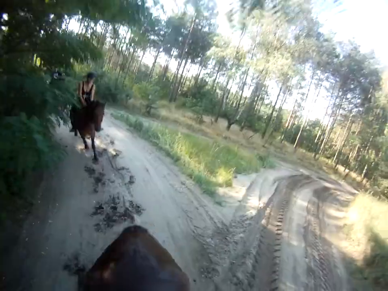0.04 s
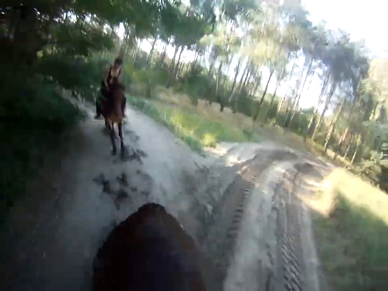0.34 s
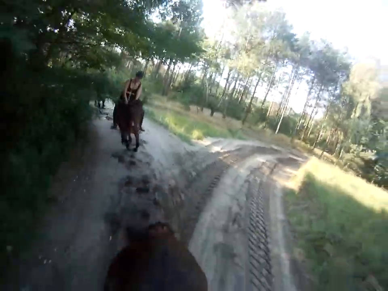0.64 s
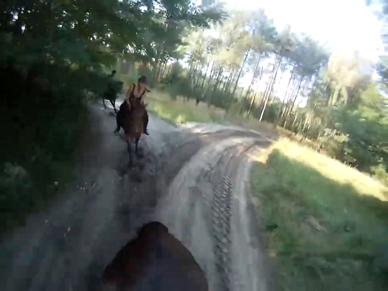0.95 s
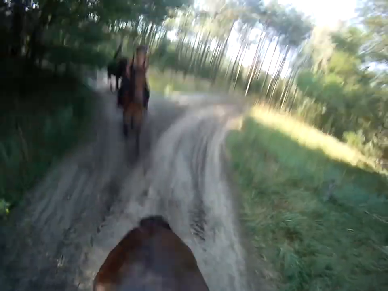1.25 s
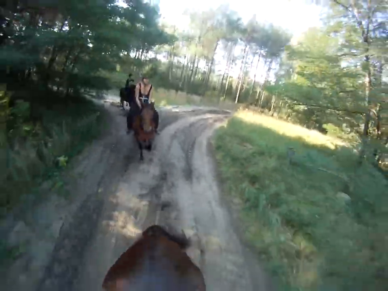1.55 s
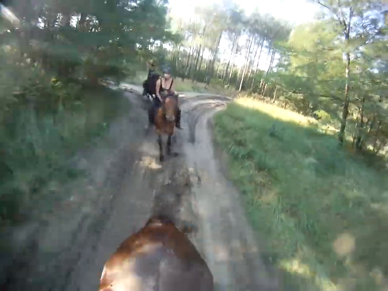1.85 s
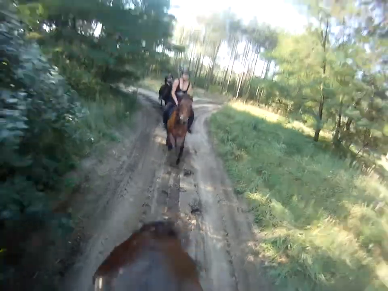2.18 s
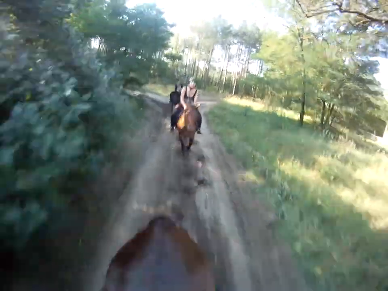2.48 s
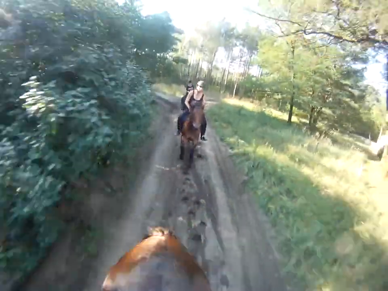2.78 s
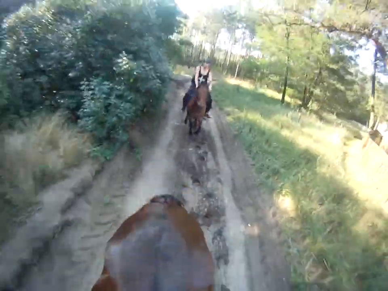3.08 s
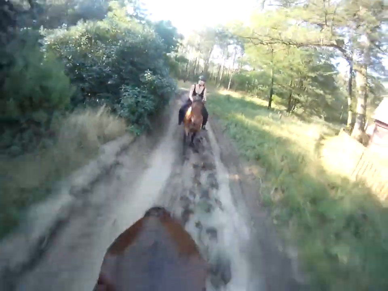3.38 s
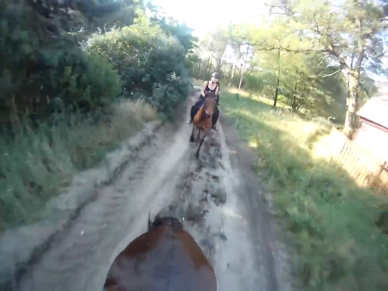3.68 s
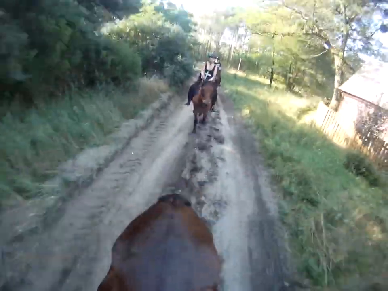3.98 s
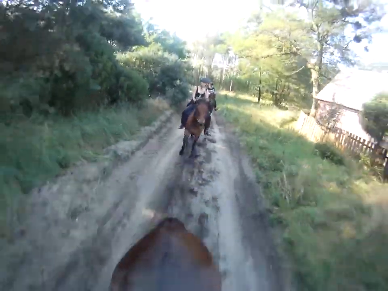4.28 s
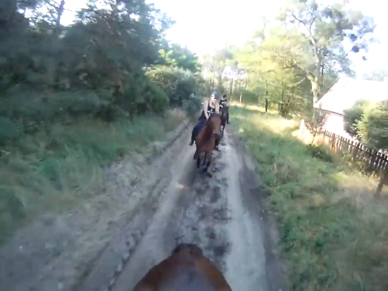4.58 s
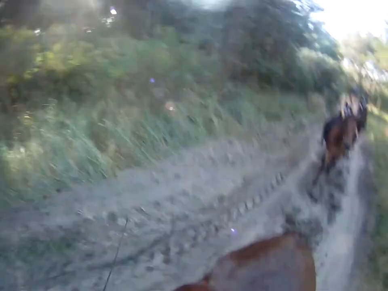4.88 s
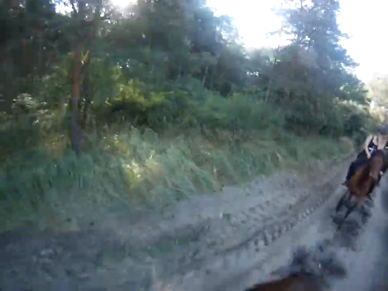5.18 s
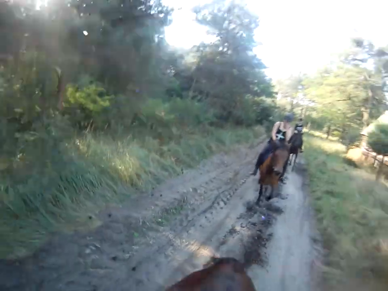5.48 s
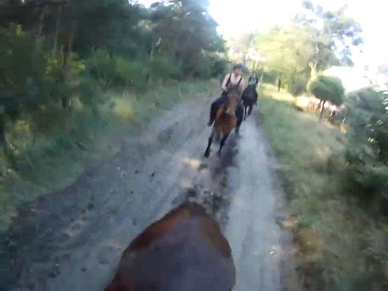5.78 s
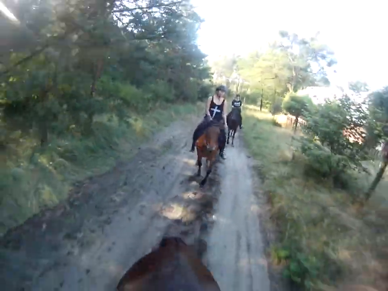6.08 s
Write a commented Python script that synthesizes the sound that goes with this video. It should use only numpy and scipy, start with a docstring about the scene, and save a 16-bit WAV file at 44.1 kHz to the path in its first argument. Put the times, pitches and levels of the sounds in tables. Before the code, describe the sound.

A horse's trot along a sandy track is heard only as jolts through a plastic case strapped to the rider. About twice a second the case scrapes briefly in its mount and gives a low double bump with a dull shudder. Sharp plastic ticks and a few tiny creaks fall between the strides. The microphone is inside the case, so everything is very close, over a faint, muffled outdoor hush.

```python
"""A horse trots along a sandy track, heard through a cased camera strapped to the rider.
A faint outdoor hush is there from the start; almost at once plastic parts rub, tick and creak.
The sand swallows the hooves, so each stride arrives through the body as a jolt: the case slides in its
mount, bumps with a dull shudder, slips, bumps again, swings out on its strap and slides back.
Fourteen strides pass in this way, and a last short creak follows the thirteenth."""
import sys
import numpy as np
from scipy import signal
from scipy.fft import rfft, irfft
from scipy.io import wavfile
from scipy.ndimage import uniform_filter1d

SR = 44100
rng = np.random.default_rng(int(sys.argv[2]) if len(sys.argv) > 2 else 0)


def put_to_file(sound):
    """Save the sound as 16-bit audio at rate SR, in the file named by the first command-line argument."""
    columns = np.atleast_2d(sound).T  # one column per channel
    safe = np.clip(columns, -1, 1)
    whole_steps = np.round(safe * 32767)
    wavfile.write(sys.argv[1], SR, whole_steps.astype(np.int16))


N = 275184
TIME = np.arange(N) / SR

# Noise spectra of the outdoors, the mount's rumble and the sound that parts the channels:
# frequency_hz, relative_density_db
HUSH_SPECTRUM = [(25, -13), (52, 26), (100, 20.5), (200, 9.5), (400, 3), (700, -2), (1150, -2.5),
                 (1600, -6), (2150, -1), (2700, -7.5), (3600, -11.5), (4400, -12.5), (5100, -13.5),
                 (6000, -20.5)]
SHUDDER_SPECTRUM = [(30, -24.5), (70, 4), (110, -0.5), (200, -6), (280, -12), (420, -31.5), (800, -30),
                    (2000, -48.5)]
SIDE_SPECTRUM = [(40, -18), (110, -13.5), (210, -5.5), (400, -1.5), (900, -7), (2500, -12.5), (6000, -24)]
# Resonances of the case: centre_hz, width_hz, rubbed_db, tapped_db
CASE_MODES = [(197, 180, -8, -12), (480, 720, -14, -17), (878, 151, -2, -39), (1083, 133, -1.5, -17),
              (1390, 248, -4.5, -6.5), (1795, 540, -7.5, -7.5), (2018, 180, -0.5, -52),
              (2197, 150, -2, 3.5), (2436, 270, -9.5, -13), (2810, 203, -13.5, -8), (3512, 472, -18, -1.5),
              (4130, 670, -35, -12), (5056, 615, -33.5, -1.5)]
# The case slides back as the rider rises: start_s, length_s, level_db, snap_energy_db
BACK_SLIDES = [(.046, 0.031, -33, -20), (0.3363, .03, -54, -17.5), (0.8016, 0.056, -38, -5.5),
               (1.24, 0.063, -41.5, -28), (1.712, 0.036, -50.5, -26), (2.134, 0.07, -47, -26.5),
               (2.585, 0.025, -45.5, -18), (3.043, 0.017, -51.5, -33), (3.5, 0.028, -43, -18),
               (3.94, .02, -39, -13.5), (4.418, 0.019, -37.5, -10.5), (4.9083, 0.079, -43, -8.5),
               (5.4102, 0.08, -50.5, -8.5), (5.828, 0.025, -43, -31)]
# The case brushes its mount between slides: start_s, length_s, level_db
LIGHT_BRUSHES = [(0.084, 0.041, -54), (.48, 0.054, -58.5), (3.803, .03, -54), (4.382, 0.023, -43.5),
                 (4.983, 0.042, -57.5), (5.313, 0.09, -59.5)]
# Plastic parts catch and let go: start_s, energy_db, hardness (0 soft, about 1 hard)
PLASTIC_TICKS = [(0.0553, -2, 0.01), (0.0722, 2, 0.97), (.2067, -30, 0.7), (.2419, -24.5, 0.7),
                 (0.5802, -4, 0.9), (.662, -22, 0.5), (0.6855, 2.5, 0.82), (.713, 1, 0), (.836, -6, 0.02),
                 (0.8651, -3, 1.03), (0.9926, -30, .57), (1.174, -10.5, 0.4), (1.2484, -16.5, 1),
                 (1.344, -14, 0.02), (1.5066, -19, 0.78), (1.5717, -4, 1), (1.5812, 9, 0.17),
                 (2.033, -15.5, 0), (2.066, -5.5, 0.2), (2.4145, -12, 0.82), (2.8077, -10, 0.47),
                 (2.8519, -7.5, 0.73), (2.9222, -17.5, 0.65), (3.1937, -3, 0.72), (3.3037, -21, 0.7),
                 (3.3755, -10.5, 0.65), (3.4444, -8.5, 0), (3.888, -6, 0), (4.1458, -17.5, 0.53),
                 (4.1571, -13, 0.23), (4.2303, -17.5, .55), (4.2834, -17.5, 0.37), (4.5814, -26.7, 0.2),
                 (4.7518, -17, 0), (4.9709, -5, 1), (5.4474, -10, 0), (5.4775, -4, 0.98),
                 (5.616, -17.5, 0.6), (5.6244, -8.5, 0.79), (5.7761, -6, 0.2)]
# The mount creaks and nudges the strap: start_s, length_s, level_db, slip_rate_hz, swing_db
MOUNT_CREAKS = [(0.058, 0.011, -40, 500, -22), (1.341, 0.02, -49.5, 480, -46),
                (3.174, .0175, -38, 516, -24.5), (3.191, 0.012, -44, 620, -35),
                (5.45, 0.00875, -31, 590, -25), (5.9528, 0.0098, -23, 530, -25)]
# Resonances of the mount's clip: frequency_hz, relative_level_db, t60_s
CLIP_MODES = [(540, 1, 0.0071), (1080, 2.5, 0.025), (1490, 10.5, 0.0041), (2060, 0, 0.042),
              (2700, -46, 0.0043), (3530, -30, .006)]
# One jolt a stride: landing_s, bump_gap_s, first_bump_db, landing_bump_db, contact_ms,
# shudder_db, swing_db, swing_decay_db_per_s, slide_start_s, slide_db
STRIDE_JOLTS = [(.307, 0.025, -12.5, -5, 1.02, -28, -21, 118, .246, -40.5),
                (.777, 0.045, -5.5, -13, 0.98, -29.5, -12, 167, .693, -34.5),
                (1.209, .026, -8.5, -2.5, 0.56, -22.5, -17, 108, 1.1355, -31.5),
                (1.654, 0.028, -9, -3.5, 0.59, -30, -20, 127, 1.584, -29.5),
                (2.095, 0.027, -7.5, -3.5, 1.1, -28, -17.5, 130, 2.032, -34.5),
                (2.546, 0.028, -8, -4, 1.38, -27.5, -18.5, 95, 2.476, -33.5),
                (2.997, 0.039, -18.5, -8, 1.65, -34.5, -13.5, 139, 2.924, -39),
                (3.462, 0.04, -17, -12.5, 1, -36, -13.5, 222, 3.383, -42),
                (3.902, 0.035, -15, -10, 2.4, -33.5, -12, 144, 3.8347, -39.5),
                (4.374, 0.037, -9.5, -10.5, 3.1, -32.5, -14, 268, 4.295, -40),
                (4.858, 0.047, -9, -5.5, 1.54, -31.5, -15.5, 153, 4.772, -34.5),
                (5.299, 0.03, -6.5, -9, 1.06, -30, -13.5, 120, 5.225, -34.5),
                (5.794, 0.043, -13, -12.5, 2.53, -35, -13, 216, 5.708, -38.5),
                (6.236, 0.026, -7.5, -7, 2.3, -32.5, -14, 144, 6.176, -37)]


def amp(db):
    """Decibels to amplitude ratio."""
    return 10 ** (np.asarray(db) / 20)


def unit_rms(x):
    """Normalises a signal to unit mean power."""
    return x / np.sqrt(np.mean(x ** 2) + 1e-20)


def add(mix, start_s, sound):
    """Superposes a sound on the mix."""
    part = mix[max(round(start_s * SR), 0):][:len(sound)]
    part += sound[:len(part)]


def noise(spectrum):
    """Spectral shaping of white noise, at unit rms."""
    hz, db = np.transpose(spectrum)
    shape = amp(np.interp(np.log(np.fft.rfftfreq(N, 1 / SR) + 1), np.log(hz), db))
    return unit_rms(irfft(rfft(rng.standard_normal(N)) * shape, N))


def drift(rate_hz):
    """Low-passed noise: a slow random fluctuation at unit rms."""
    shape = np.exp(-(np.fft.rfftfreq(N, 1 / SR) / rate_hz) ** 2)
    return unit_rms(irfft(rfft(rng.standard_normal(N)) * shape, N))


def hush(level_db=-52, threshold_db=-8, dip_per_db=1.5, deepest_db=8, lag_s=0.089, width_s=0.098):
    """Transmission through the closed case colours the outdoor noise; it dips after hard landings."""
    dip_db = np.zeros(N)
    for landing_s, _, _, bump_db, *_ in STRIDE_JOLTS:
        depth_db = np.clip(dip_per_db * (bump_db - threshold_db), 0, deepest_db)
        dip_db += depth_db * np.exp(-((TIME - landing_s - lag_s) / width_s) ** 2)
    return amp(level_db - dip_db) * noise(HUSH_SPECTRUM)


def strap_swing(pitch_hz=36, waver=0.11, rest_db=-59, build_db_per_s=215,
                landing_lag_s=0.01388, creak_lag_s=0.029, creak_decay_db_per_s=240):
    """Damped oscillation on the springy strap: a faint rocking swells after each landing or creak."""
    kicks = [(s + landing_lag_s, db, decay) for s, *_, db, decay, _, _ in STRIDE_JOLTS]
    kicks += [(s + creak_lag_s, db, creak_decay_db_per_s) for s, *_, db in MOUNT_CREAKS]
    phase = 2 * np.pi * np.cumsum(pitch_hz * (1 + waver * drift(rate_hz=9))) / SR
    out = amp(rest_db) * np.sin(phase)
    for peak_s, db, decay_db_per_s in kicks:
        near = abs(TIME - peak_s) < 0.5
        t = TIME[near] - peak_s
        envelope = amp(db - np.maximum(-build_db_per_s * t, decay_db_per_s * t))
        out[near] += envelope * np.cos(phase[near] - np.interp(peak_s, TIME, phase))
    return np.sqrt(2) * out  # the levels are rms


def case_ring(hardness, scatter_db, size=2048):
    """Impulse response of the case, at unit energy; each contact point weights the modes differently."""
    centre_hz, width_hz, rubbed_db, tapped_db = np.transpose(CASE_MODES)
    db = rubbed_db + hardness * (tapped_db - rubbed_db) + scatter_db * rng.standard_normal(len(centre_hz))
    hz = abs(np.fft.fftfreq(size, 1 / SR))[:, None]
    power = (amp(db) ** 2 / (1 + ((hz - centre_hz) / width_hz) ** 2) ** 4).sum(1)
    log_gain = 0.5 * np.log(power + 1e-8)
    ring = np.fft.ifft(np.exp(np.conj(signal.hilbert(log_gain)))).real  # minimum phase, hence causal
    return ring / np.linalg.norm(ring)


def snap(energy_db, hardness, grit=0.15, hard_s=0.0019, soft_s=0.0034):
    """Impulse excitation with brief chatter: harder snaps are shorter and reach the case's upper modes."""
    t = np.arange(SR // 60) / SR
    chatter_s = np.interp(hardness, [0, 1], [soft_s, hard_s])
    force = grit * rng.standard_normal(len(t)) * np.exp(-t / chatter_s)
    force[0] += 1
    tick = signal.fftconvolve(force, case_ring(hardness, scatter_db=0.5))
    return amp(energy_db) * tick / np.linalg.norm(tick)


def slides(creep_s=0.026, slip_share=0.46):
    """Motion of case against mount: start_s, length_s, level_db, swell_db, throb_db, snap_energy_db."""
    no_snap = -np.inf
    rows = [(s, length_s, db, -2, 5, snap_db) for s, length_s, db, snap_db in BACK_SLIDES]
    rows += [(s, length_s, db, -3, 0, no_snap) for s, length_s, db in LIGHT_BRUSHES]
    for landing_s, gap_s, *_, start_s, db in STRIDE_JOLTS:
        slide_s = max(landing_s - gap_s - start_s, 0.01)
        slip_s = slip_share * gap_s
        rows += [(start_s - creep_s, creep_s, db - 21, 12, 0, no_snap),  # creeps
                 (start_s, slide_s, db, 6, 1, db + 17),  # slides ever harder into the first bump
                 (landing_s - slip_s, slip_s, db - 2, -9, 0, db + 21)]  # slips before the second
    return rows


def rubs(slips_per_s=1100, spread_db=4.5, uneven_db=3, rise_s=0.0029, fall_s=0.0049, throb_hz=28):
    """Stick-slip friction: the case breaks free, often with a snap, and tiny irregular slips ring it."""
    out = np.zeros(N)
    sizes = amp(spread_db * np.minimum(rng.exponential(1, N), 3)) * rng.choice([-1, 1], N)
    slips = unit_rms(sizes * (rng.random(N) < slips_per_s / SR))
    friction = (slips + 0.4 * rng.standard_normal(N)) * amp(uneven_db * drift(rate_hz=91))
    for start_s, length_s, db, swell_db, throb_db, snap_db in slides():
        force = friction[max(round(start_s * SR), 0):][:round((length_s + 0.03) * SR)]
        t = np.arange(len(force)) / SR
        pressure = (1 - np.exp(-t / rise_s)) * np.exp(-np.maximum(t - length_s, 0) / fall_s)
        pressure *= amp(swell_db * np.minimum(t / length_s, 1))
        pressure *= amp(throb_db * np.cos(2 * np.pi * throb_hz * t))
        rub = signal.fftconvolve(force * pressure, case_ring(hardness=0, scatter_db=3.5))
        add(out, start_s, amp(db) * rub * np.sqrt(length_s * SR) / np.linalg.norm(rub))
        add(out, start_s, snap(snap_db, hardness=0))
    return out


def ticks(below_bump_db=11):
    """Free vibration of the case, set off as plastic parts let go and by each landing bump."""
    out = np.zeros(N)
    for start_s, energy_db, hardness in PLASTIC_TICKS:
        add(out, start_s, snap(energy_db, hardness))
    for landing_s, _, _, bump_db, *_ in STRIDE_JOLTS:
        add(out, landing_s, snap(bump_db - below_bump_db, hardness=0.76))
    return out


def creaks(jitter=0.078, fade_db=-9, contact_s=0.00007):
    """Relaxation oscillation: a few slips fall nearly into step, each ringing the clip of the mount."""
    out, t = np.zeros(N), np.arange(SR // 20) / SR
    ring = sum(amp(db - 60 * t / t60_s) * np.sin(2 * np.pi * hz * t) for hz, db, t60_s in CLIP_MODES)
    ring = np.convolve(ring, signal.windows.gaussian(21, contact_s * SR))  # contact time dulls the treble
    for start_s, length_s, db, slip_rate_hz, _ in MOUNT_CREAKS:
        gaps_s = (1 + jitter * rng.standard_normal(20)) / slip_rate_hz
        slips_s = np.cumsum(gaps_s) - gaps_s[0]
        creak = np.zeros(SR // 10)
        for slip_s in slips_s[slips_s < length_s]:
            add(creak, slip_s, amp(fade_db * slip_s / length_s) * ring)
        add(out, start_s, amp(db) * creak * np.sqrt(length_s * SR) / np.linalg.norm(creak))
    return out


def shudder(width_gaps=1.326, lead_gaps=0.68):
    """Forced vibration: a stride's weight passes through the mount as a rumble between the two bumps."""
    envelope = sum(amp(db) * np.exp(-((TIME - landing_s + lead_gaps * gap_s) / (width_gaps * gap_s)) ** 2)
                   for landing_s, gap_s, _, _, _, db, *_ in STRIDE_JOLTS)
    return envelope * noise(SHUDDER_SPECTRUM)


def bumps(pitch_hz=54, t60_s=0.058, first_stretch=1.5):
    """A heavily damped resonator, the mount, takes two pushes a stride; the first is longer, so duller."""
    out, t = np.zeros(N), np.arange(SR // 6) / SR
    ring = amp(-60 * t / t60_s) * np.cos(2 * np.pi * pitch_hz * t)
    push_ms = 1000 * np.arange(-600, 600) / SR
    for landing_s, gap_s, first_db, landing_db, contact_ms, *_ in STRIDE_JOLTS:
        pair = (landing_s - gap_s, first_db, contact_ms * first_stretch), (landing_s, landing_db, contact_ms)
        for peak_s, db, width_ms in pair:
            push = 1 / np.cosh(np.pi / 2 * push_ms / width_ms)
            bump = signal.fftconvolve(push, ring)
            add(out, peak_s - np.argmax(bump) / SR, -amp(db) * bump / bump.max())
    return out


def scene(imbalance_db=-20, side_db=-47, rejoin_s=0.051, hiss_db=-77):
    """Mid-side stereo, nearly mono: the channels part briefly after each landing, over a faint hiss."""
    middle = hush() + strap_swing() + rubs() + ticks() + creaks() + shudder() + bumps()
    parting = sum(amp(bump_db) * (TIME > landing_s) * np.exp(-abs(TIME - landing_s) / rejoin_s)
                  for landing_s, _, _, bump_db, *_ in STRIDE_JOLTS)
    parting = uniform_filter1d(parting, size=300)
    imbalance = amp(imbalance_db) * drift(rate_hz=10) * middle
    side = parting * (imbalance + amp(side_db) * noise(SIDE_SPECTRUM))
    side += amp(hiss_db) * noise([(100, -6), (3500, -3.5), (6000, -4), (8000, -39)])
    return np.array([middle + side, middle - side])


def record(dry, low_cut_hz=12, hold_hz=12000, band_limit_hz=15450):
    """Spectral imaging: sample-and-hold at a low rate mirrors the sound into a glassy treble."""
    dry = signal.sosfilt(signal.butter(1, low_cut_hz, "high", fs=SR, output="sos"), dry)
    baseband = signal.oaconvolve(dry, signal.firwin(255, hold_hz / 2, fs=SR)[None], "same")
    mirrored = baseband * (1 + 2 * np.cos(2 * np.pi * hold_hz * TIME))
    hold_droop = np.sinc(np.fft.rfftfreq(N, 1 / SR) / hold_hz)
    held = irfft(rfft(mirrored) * hold_droop, N)
    low_pass = signal.firwin(141, band_limit_hz, window=("kaiser", 9), fs=SR)
    return signal.oaconvolve(held, low_pass[None], "same")


dry = scene()
out = record(dry)
put_to_file(out)
```